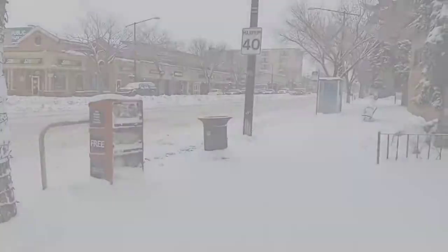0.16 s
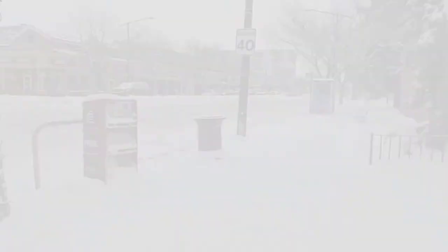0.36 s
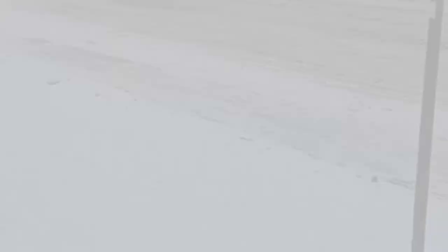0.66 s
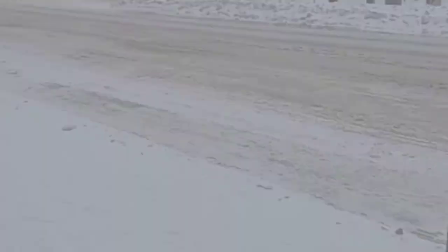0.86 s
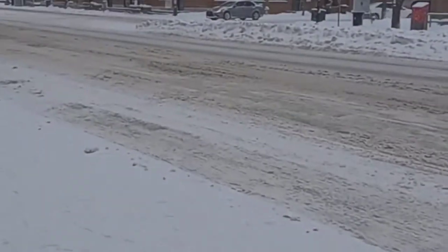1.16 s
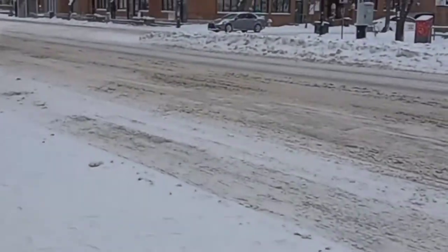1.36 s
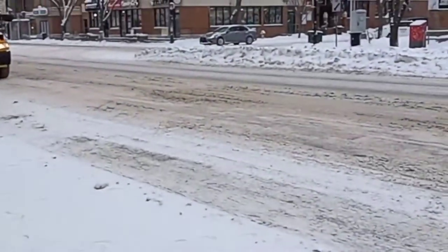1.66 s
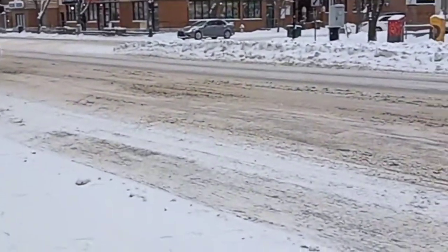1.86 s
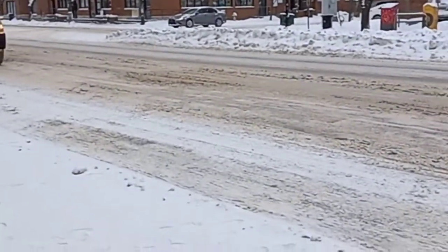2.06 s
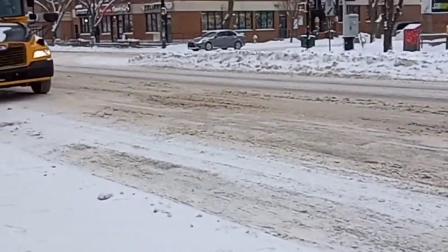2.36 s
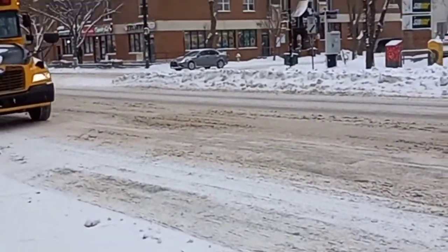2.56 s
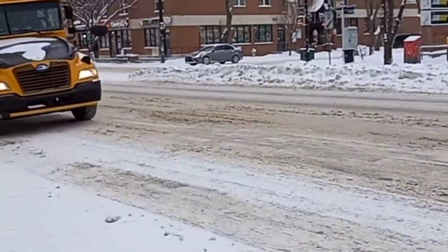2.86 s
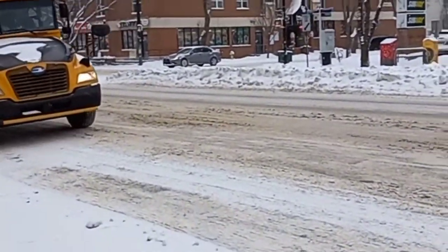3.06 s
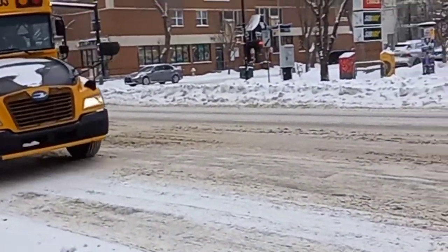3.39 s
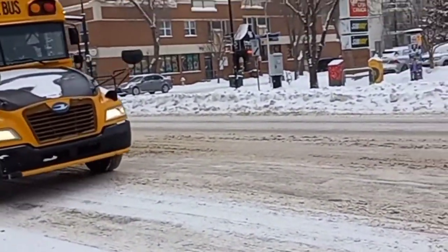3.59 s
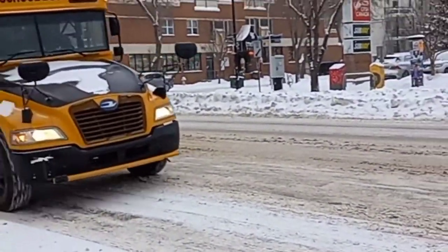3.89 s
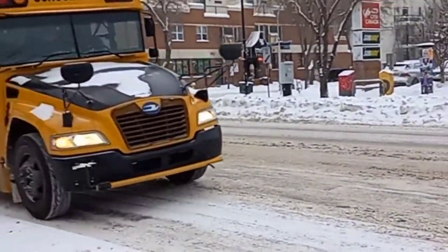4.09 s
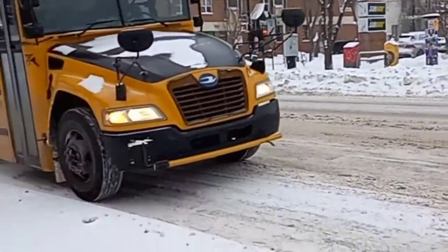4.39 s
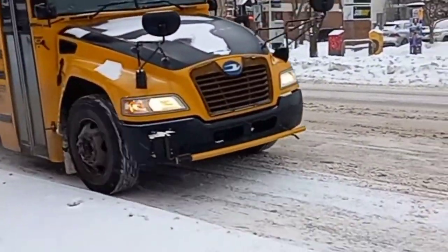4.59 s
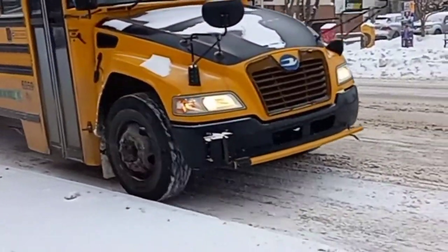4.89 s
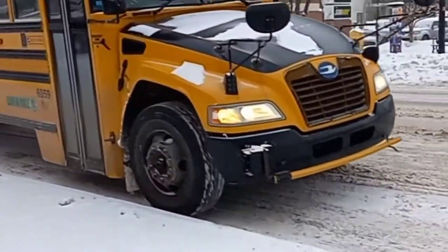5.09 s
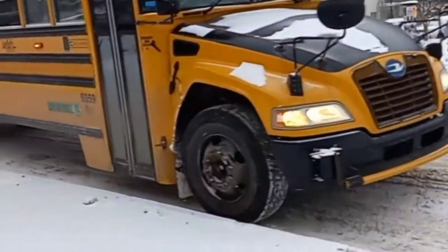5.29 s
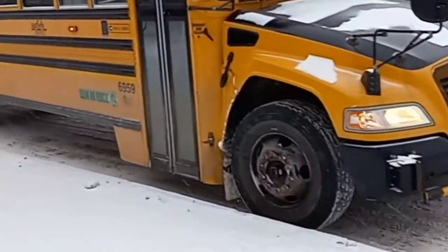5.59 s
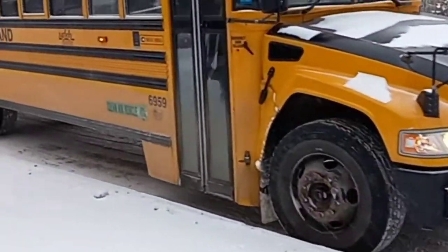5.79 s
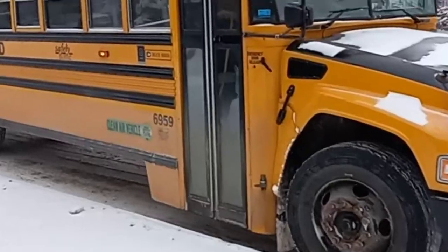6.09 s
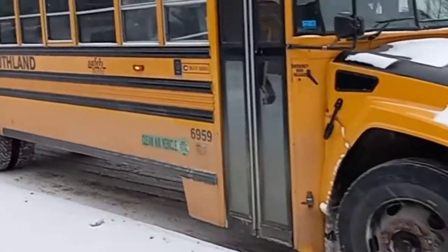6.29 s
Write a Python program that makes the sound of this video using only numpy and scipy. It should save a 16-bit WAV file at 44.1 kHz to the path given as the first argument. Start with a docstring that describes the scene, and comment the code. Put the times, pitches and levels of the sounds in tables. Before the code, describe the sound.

On a snowy street, a heavy bus creeps close with low rumble and snow crunch, piercing wavering brake squeals, soft air hisses and a final juddering groan.

```python
"""A school bus creeps up to the kerb of a snowy street and stops beside the listener.
Its engine is a stack of low harmonics; noise and ringing make the body rumble and boom and the tyres crunch snow.
The brakes squeal as wavering tones, let off air twice as hissing noise, and groan at the end in uneven jerks.
Far traffic, a wash of noise, is heard first, then a brief silence; puffs of wind and a faint hiss join the bus."""
import sys
import numpy as np
from scipy import signal
from scipy.io import wavfile

SR = 44100
rng = np.random.default_rng(int(sys.argv[2]) if len(sys.argv) > 2 else 0)


def store_wav(level_fs):
    """Save 16-bit WAV to argv[1]."""
    pcm = np.round(np.clip(np.atleast_2d(level_fs), -1, 1) * 32767)
    wavfile.write(sys.argv[1], SR, pcm.T.astype(np.int16))


N = 284445
TIME = np.arange(N) / SR  # seconds
CUTOFF_HZ = 15600  # nothing is kept above this

# Default stereo balance. Each row: frequency in Hz, left over right in dB.
BALANCE = [(60, -0.3), (200, -1), (380, -4), (700, 4), (1300, -2), (2400, -2), (8000, 3), (15000, -2)]
# How alike left and right are by default. Each row: frequency in Hz, likeness (1 same, 0 unrelated).
LIKENESS = [(60, 0.96), (130, 0.95), (290, 1), (450, 0.23), (800, 0.72), (1300, 0.89), (3000, 0.03),
            (5500, 0.08), (7000, 0.7), (15000, 1)]

# Tone of the far traffic. Each row: frequency in Hz, strength in dB per Hz.
TRAFFIC_COLOUR = [(36, -33), (55, -11), (76, 6), (110, -7), (200, -11.5), (290, -10), (360, -17),
                  (650, -20), (950, -23), (1300, -22.5), (2100, -29.5), (2850, -35.5), (3500, -36),
                  (4700, -44), (7200, -44), (9500, -61), (15000, -53)]
# Far traffic hisses mostly from the right. Each row: frequency in Hz, left over right in dB.
TRAFFIC_BALANCE = [(60, -0.5), (700, -0.5), (1300, -3), (2600, -12), (5200, -5), (7500, -6), (10000, -1)]
# Far traffic in left and right. Each row: frequency in Hz, likeness (below 0 means opposed).
TRAFFIC_LIKENESS = [(130, 0.96), (300, 0.85), (700, -0.26), (1300, -1.11), (2600, 0.66), (5200, -0.22),
                    (7500, 0.82), (10000, 1)]
# Far tyres swish past twice. Each row: time in seconds, lift of the hiss in dB.
FAR_SWISH = [(0, 6), (0.07, 4), (0.2, -0.5), (0.33, 5), (0.5, -1)]
TRAFFIC_DB = -30  # the wash before the swish is added
# The brief silence: its start and its end in seconds.
SILENCE_S = (0.505, 0.537)

# How near the bus sounds. Each row: time in seconds, nearness from 0 to 1.
NEARNESS = [(0.55, 0.18), (2.0, 0.27), (3.3, 1), (4.4, 0.86), (5.4, 0.8), (6.15, 0.77)]
# Engine. Each row: time in seconds, exhaust pulses per second of one cylinder bank,
# level in dB before a fixed trim.
ENGINE = [(0.54, 26.4, -38), (2.2, 32, -44), (4.0, 38.4, -52), (4.7, 27.6, -35.5), (5.0, 28, -22.5),
          (5.3, 29.9, -28.5), (5.65, 25, -23.5), (5.9, 25, -33), (6.1, 24, -55), (6.45, 27, -32)]
# Engine harmonics. Each row: multiple of the pulse rate, strength in dB against each other.
ENGINE_HARMONICS = [(2, -3.5), (3, 1), (4, -13), (5, -16.5), (6, -14), (9, -13), (10, -27.5)]
# Ruts that set the body booming. Each row: start in seconds, length in seconds, level in dB, pitch in Hz.
RUTS = [(0.534, 0.092, -35.5, 78.1), (2.334, 0.079, -30.5, 95.7), (2.551, 0.13, -25, 84),
        (2.883, 0.034, -31.5, 89.6), (3.065, 0.047, -26.5, 87.3), (3.237, 0.065, -30, 88),
        (3.395, 0.15, -26, 96.5), (3.915, 0.11, -28, 90.4), (4.101, 0.25, -26.5, 91.7),
        (4.795, 0.23, -32.5, 81.2), (5.84, 0.25, -28, 83)]
BOOM_ATTACK_S, BOOM_RELEASE_S = 0.031, 0.029
ROAD_BOOM_DB, ROAD_BOOM_HZ = -44.5, 84  # the faint boom kept up all the way
# Tone of the running gear. Each row: frequency in Hz, strength in dB per Hz.
RUMBLE_COLOUR = [(21, -41), (36, -15.5), (67, -4), (86, 3), (162, -9.5), (215, -11.5), (289, -7),
                 (318, -22), (345, -20), (437, -14.5), (600, -29.5), (780, -50), (1320, -120)]
# Rumble of the rolling bus. Each row: time in seconds, level of its 125-400 Hz part in dB.
RUMBLE = [(0.56, -39), (0.9, -38.5), (2.1, -37), (2.5, -34), (2.95, -38), (3.25, -33.5), (3.85, -35),
          (4.12, -31), (4.55, -36), (4.78, -31.5), (6.12, -36.5)]

# Tone of the crunching snow. Each row: frequency in Hz, strength in dB per Hz.
CRUNCH_COLOUR = [(380, 4.5), (470, 0.5), (560, -9.5), (680, 7), (850, 0), (1100, -1.5), (1300, -12),
                 (1700, -23)]
# Packed snow under the tread. Each row: start in seconds, length in seconds,
# load in dB before the crunch is mixed.
PACKED_SNOW = [(0.696, 0.028, -49.5), (1.442, 0.32, -45.5), (2.355, 0.053, -41.5), (2.487, 0.11, -40.5),
               (3.024, 0.72, -45.5), (3.836, 0.72, -41.5), (4.654, 0.19, -41), (4.88, 0.18, -40),
               (5.156, 0.043, -39.5), (6.3, 0.012, -41.5), (6.428, 0.022, -44)]
LOOSE_SNOW_DB = -48.5  # load elsewhere, also before mixing
SNOW_ATTACK_S, SNOW_RELEASE_S = 0.069, 0.042  # rolling on to and off a packed stretch
LUMPS_DB = -56.5  # small lone lumps
# Tone of the spray. Each row: frequency in Hz, strength in dB per Hz.
SLUSH_COLOUR = [(710, -6), (1200, 1.5), (1410, -0.5), (1840, -1.5), (2750, -8), (3360, -6), (4090, -12.5),
                (5800, -19.5), (7540, -56), (12800, -120)]
# Spray off the tyres. Each row: time in seconds, level of its 1290-3230 Hz part in dB.
SLUSH = [(0.56, -51), (1.05, -48.5), (1.36, -49), (1.43, -45), (1.9, -47), (2.1, -43.5), (2.52, -44),
         (2.75, -44.5), (3.5, -44.5), (4.05, -46.5), (4.17, -49.5), (4.9, -48.5), (5.25, -51), (5.8, -49.5),
         (6.45, -54)]
# Tone of the faint hiss. Each row: frequency in Hz, strength in dB per Hz.
HISS_COLOUR = [(4000, -1.5), (7500, 10), (9500, -16), (13000, 10), (15500, -26)]

# The squeal sinks as the pedal goes down and rises as it eases. Each row: time in seconds, pitch in Hz.
SQUEAL_PITCH = [(0.55, 6620), (1.05, 6685), (2.0, 6665), (2.45, 6695), (3.0, 6650), (3.6, 6595),
                (4.5, 6535), (4.57, 6465), (5.0, 6450), (5.2, 6475), (5.54, 6474), (5.62, 6570),
                (5.68, 6590), (6.13, 6335), (6.19, 6230), (6.215, 6335), (6.39, 6270), (6.42, 6200)]
# Each time the linings catch. Each row: start in seconds, length in seconds, whistle in dB, rasp in dB,
# how far the rasp lies below the squeal pitch in Hz, whistle overtone against the whistle in dB,
# left over right in dB.
GRIPS = [(0.575, 0.5, -54, -50, 92, -33, -7), (1.036, 0.35, -53.5, -46, 77, -28, -2.5),
         (1.451, 0.41, -47, -42.5, 100, -22, -5), (1.925, 0.091, -48, -44, 60, -31, -3),
         (2.036, 0.18, -49, -38.5, 140, -24, -4.5), (2.25, 0.095, -53, -48, 150, -28, -3),
         (2.393, 0.12, -45, -53, 64, -25, 3.5), (2.541, 0.077, -44, -46.5, 64, -28, 2),
         (2.622, 0.11, -50, -44, 120, -32, -3), (2.777, 0.21, -42, -46.5, 87, -32, 5),
         (3.038, .05, -48, -51, 49, -24, 0), (3.186, 0.3, -50, -39.5, 73, -24, -1),
         (3.492, 0.14, -43, -42, 50, -24, 0), (3.718, 0.016, -53, -38.5, 40, -24, -1),
         (3.783, 0.24, -42, -45, 63, -31, 1.5), (4.105, 0.082, -39, -36, 60, -32, 1.5),
         (4.23, 0.22, -40.5, -40, 90, -26, 1.5), (4.496, 0.033, -41, -50, 40, -35, -6),
         (4.565, 0.1, -35, -44, 40, -37, -5.5), (4.72, 0.048, -50.5, -58, 20, -33, -3),
         (4.817, 0.096, -44, -41, 31, -19, 5), (4.933, 0.015, -31, -37, 20, -27, -12),
         (4.98, 0.044, -27, -35, 20, -25, -11), (5.16, 0.056, -34, -49, 36, -30, -4),
         (5.257, 0.046, -26.5, -58, 36, -28, 1), (5.341, 0.027, -23.5, -58, 36, -37, -4),
         (5.427, 0.03, -29.5, -63, 36, -19, -8), (5.48, 0.04, -21, -54, 50, -21.5, -6.5),
         (5.562, 0.036, -28, -35, 50, -22.5, -12), (5.624, 0.023, -48, -38.5, 30, -26, -10),
         (6.156, 0.023, -34, -37, 6.9, -17, 0), (6.216, 0.079, -31, -40, 12, -26, 1),
         (6.369, 0.034, -34.5, -39, 50, -18, -9.5)]
GRIP_ATTACK_S, GRIP_RELEASE_S = 0.031, 0.05
GRIP_SWELL_DB, GRIP_CREST = 4, 0.67  # the swell, and the share of the length where it peaks
STUTTER, STUTTER_HZ = 0.14, 35  # depth and speed limit of the whistle's shaking
SQUEAL_LAG_WANDER_S = 0.000021

# Snow cracking under the tread. Each row: time in seconds, peak in dB, pitch in Hz.
CRACKS = [(0.668, -35, 1400), (0.718, -31, 800), (0.7933, -37, 900), (0.816, -29.5, 1070),
          (0.8512, -29, 990), (0.885, -34, 1080), (0.9123, -38, 1000), (1.0705, -29, 1370),
          (1.175, -27.5, 1300), (1.3355, -30, 950), (1.414, -29, 1170), (1.523, -33, 1000),
          (1.66, -32, 900), (1.6946, -23, 920), (1.755, -29, 950), (1.889, -32, 1000), (2.083, -28, 880),
          (2.359, -25, 980), (2.389, -27, 810), (2.472, -26.5, 1110), (2.519, -21, 840),
          (2.586, -19.5, 865), (4.3083, -24.5, 1000), (4.945, -25.5, 830), (5.356, -31, 850)]
# Puffs of wind on the microphone. Each row: start in seconds, length in seconds,
# level in dB before panning, left over right in dB.
GUSTS = [(0.812, 0.074, -29, 10), (1.087, 0.018, -32, 4), (2.083, 0.022, -38, 10), (3.05, 0.087, -37, 5),
         (3.29, 0.54, -38.5, 2)]
GUST_ATTACK_S, GUST_RELEASE_S = 0.024, 0.058
# Small bright ticks of grit. Each row: time in seconds, snap at its peak in dB, tail at its start in dB.
TICKS = [(1.031, -46, -58), (1.037, -34, -43.5), (2.4195, -41, -54), (2.427, -40, -46), (2.497, -54, -45)]
TICK_SNAP_S, TICK_TAIL_S = 0.00089, 0.028  # when the snap peaks; when the tail is down to 37 %

# Air let out of the brakes. Each row: start in seconds, length in seconds, level in dB, swell in dB.
AIR_RELEASES = [(2.999, 0.73, -38.5, 6), (5.74, .39, -47, 0.5)]
# Tone of each release, one list apiece. Each row: frequency in Hz, strength in dB per Hz.
AIR_COLOURS = [
    [(2500, -7), (3600, -9), (4700, -18), (6100, -6), (7000, -3), (7700, -1), (8500, -7.5), (11000, -5.5),
     (13000, -11), (15500, -11)],
    [(2500, -2), (3600, -6), (5200, -3), (6300, -12), (7350, 10.5), (8500, -8), (11200, -5), (13000, -8),
     (15500, -15)],
]
# Stereo balance of the air. Each row: frequency in Hz, left over right in dB.
AIR_BALANCE = [(3000, -9.5), (5500, -5.5), (7500, -5.5), (11000, -8)]
# The air in left and right. Each row: frequency in Hz, likeness.
AIR_LIKENESS = [(5500, 0), (7500, 0.6), (9500, 0.1), (13000, 0.82)]
VALVE_OPEN_S, VALVE_CLOSE_S, AIR_CREST = 0.15, 0.16, 0.32  # the jet peaks at this share of its length
NOZZLE_HZ, NOZZLE_WIDTH_HZ, NOZZLE_RING = 7470, 290, 0.53  # the valve mouth rings in the jet
# The vent's hollow note. Each row: frequency in Hz, width in Hz, strength in dB.
VENT_MODES = [(3130, 270, -2), (4160, 1700, -1.5)]
VENT_S, VENT_LENGTH_S, VENT_DB, VENT_ATTACK_S, VENT_RELEASE_S = 3.47, 0.35, -46.5, 0.04, 0.09

# Other wheels that join the squeal. Each row: start in seconds, length in seconds,
# pitch above the main squeal in Hz, level in dB before panning.
OTHER_BRAKES = [(4.28, 0.18, -145, -45), (4.77, 0.32, 90, -44), (4.836, 0.26, -66.5, -36)]
# Ringing of the chassis. Each row: frequency in Hz, width in Hz, strength in dB.
CHASSIS = [(76, 23, 1), (125, 28.4, 4), (171, 68, -2), (222, 44, 0), (291, 38, -2), (570, 170, -21.5),
           (800, 230, -29)]
GROAN_S, GROAN_LENGTH_S, GROAN_DB, GROAN_ATTACK_S, GROAN_RELEASE_S = 6.22, 0.16, -21, 0.053, 0.2


def from_db(db):
    """Turn decibels into a plain multiplier."""
    return 10 ** (np.asarray(db) / 20)


def rms_one(x):
    """Scale a sound to an average strength (rms) of 1."""
    return x / np.sqrt(np.mean(x ** 2) + 1e-20)


def in_time(rows):
    """Draw each column of a table as a curve, sample by sample."""
    seconds, *columns = np.transpose(rows)
    return [np.interp(TIME, seconds, column) for column in columns]


def at_hz(points, hz):
    """Read a table at one frequency, on a logarithmic pitch scale."""
    table = np.array(points)
    return np.interp(np.log(hz), np.log(table[:, 0]), table[:, 1])


def panned(x, pan_db):
    """Make stereo, with the left louder than the right by pan_db."""
    return np.array([x * from_db(pan_db / 2), x * from_db(-pan_db / 2)])


def lagged(x, lag_s):
    """Sound from the left reaches the right channel a little later."""
    return np.array([x[0], np.interp(TIME - lag_s, TIME, x[1])])


def drift(rate):
    """Slow random wandering of spread 1: noise smoothed above about rate in Hz."""
    step = 20  # drawn at every 20th sample, then joined by lines
    r = np.exp(-2 * np.pi * rate * step / SR)
    noise = rng.standard_normal(N // step + 3002)
    slow = signal.lfilter([1], [1, -2 * r, r * r], noise)[3000:]  # skip the filter's start-up
    return np.interp(np.arange(N) / step, np.arange(len(slow)), rms_one(slow))


def jolts(rate_hz):
    """Random shaking of both the height and the phase of a swing; rms 1."""
    smooth = signal.butter(3, rate_hz, fs=SR, output="sos")
    a, b = rms_one(signal.sosfilt(smooth, rng.standard_normal((2, N))))
    return (a + 1j * b) / np.sqrt(2)


def turning(hz):
    """Phase of something that turns at a changing rate, from a random start."""
    return 2 * np.pi * (np.cumsum(hz) / SR + rng.random())


def envelope(start, length, attack_s, release_s, swell_db=0, crest=.5):
    """Opens just before the start, holds while swelling to a crest and back, then closes."""
    end = start + length
    peak = start + np.clip(crest, .01, .99) * length
    below_crest = np.interp(TIME, [start, peak, end], [1, 0, 1])
    gate = np.interp(TIME, [start - attack_s, start, end, end + release_s], [0, 1, 1, 0])
    return gate * from_db(-swell_db * below_crest)


def band(x, low_hz, high_hz, order=2):
    """Keep only the frequencies between two limits."""
    limits = [low_hz, min(high_hz, SR / 2 - 500)]
    return signal.sosfilt(signal.butter(order, limits, "band", fs=SR, output="sos"), x)


def resonate(x, hz, width_hz):
    """Let a sound ring at one pitch; a narrower width rings longer."""
    r = np.exp(-np.pi * width_hz / SR)
    feed = np.array([1, 0, -1]) * (1 - r * r) / 2
    return signal.lfilter(feed, [1, -2 * r * np.cos(2 * np.pi * hz / SR), r * r], x + 1e-18)


def diffuse(colour, flicker_db, flicker_rate, balance=BALANCE, likeness=LIKENESS):
    """Third-octave bands of stereo noise, each with its own level, flicker and likeness; rms 1."""
    low, high = colour[0][0], min(colour[-1][0], CUTOFF_HZ)
    edges = np.geomspace(low, high, int(3 * np.log2(high / low)) + 2)
    white = rng.standard_normal((2, 2, N))
    together, out = drift(flicker_rate), 0
    for k, (a, b) in enumerate(zip(edges, edges[1:])):
        mid, side = band(white[k % 2], a, b)  # neighbouring bands use different noise
        hz = np.sqrt(a * b)
        alike = np.clip(at_hz(likeness, hz), -.99, .99)
        flicker = flicker_db * (together + drift(flicker_rate)) / np.sqrt(2)
        gain = from_db(at_hz(colour, hz) + flicker)
        stereo = np.sqrt(1 + alike) * mid + np.sqrt(1 - alike) * side * [[1], [-1]]
        out = out + gain * stereo * from_db(at_hz(balance, hz) * np.array([[.5], [-.5]]))
    return rms_one(out)


def traffic(swish_hz=2650, swish_width_hz=2200):
    """Far engines and tyres merge into one wash whose hiss swells and sinks."""
    wash = diffuse(TRAFFIC_COLOUR, flicker_db=2.0, flicker_rate=21,
                   balance=TRAFFIC_BALANCE, likeness=TRAFFIC_LIKENESS)
    lift, = in_time(FAR_SWISH)
    swish = (from_db(lift) - 1) * resonate(wash, swish_hz, swish_width_hz)
    return from_db(TRAFFIC_DB) * (wash + swish)


def engine():
    """The muffled exhaust leaves low harmonics of the pulse rate, each a little unsteady."""
    rate, level_db = in_time(ENGINE)
    pulse_phase = turning(rate * (1 + 0.01057 * drift(5.05)))
    throb = 0
    for multiple, db in ENGINE_HARMONICS:
        strength = from_db(db + 2.6 * drift(2.4))
        throb = throb + strength * np.sin(round(multiple) * pulse_phase + 2 * np.pi * rng.random())
    return from_db(level_db - 3.5) * rms_one(throb)


def boom(wander=0.0727, flicker_db=1.5):
    """The long body swings faintly all the way, and loudly through each rut."""
    unsteady = 1 + wander * drift(17.9)
    swing = from_db(ROAD_BOOM_DB + 2 * drift(22)) * np.sin(turning(ROAD_BOOM_HZ * unsteady))
    for s, length, db, hz in RUTS:
        shape = envelope(s, length, BOOM_ATTACK_S, BOOM_RELEASE_S)
        swing = swing + from_db(db) * shape * np.sin(turning(hz * unsteady))
    return np.sqrt(2) * swing * from_db(flicker_db * drift(34))


def body(jostle_db=1.2, jostle_rate=9):
    """A broad rumble of running gear, jostled by the uneven snow."""
    rumble_db = in_time(RUMBLE)[0] + jostle_db * drift(jostle_rate)
    near = np.clip(in_time(NEARNESS)[0], 0, 1)
    rumble = diffuse(RUMBLE_COLOUR, flicker_db=1.5, flicker_rate=14.3)
    rumble = rumble - 0.7 * resonate(rumble, 90.7, 39)  # the boom takes up the energy near its own pitch
    # from afar the rumble is dull; close by, the bonnet and wheel arch drone
    dull = 0.37 * resonate(rumble, 161, 72) + 0.57 * resonate(rumble, 44, 25) - 0.97 * resonate(rumble, 370, 420)
    drone = 0.74 * resonate(rumble, 289.6, 46)
    rumble = rumble + (1 - near) * dull + near * drone
    return from_db(rumble_db) * rumble / np.std(band(rumble, 125, 400))


def snow_grains(per_s, spread_db, top_hz, width_hz):
    """Snow crystals give way in clumps; each collapse is a dull knock of a few cycles."""
    sizes = from_db(spread_db * np.minimum(rng.exponential(1, N), 4)) * rng.choice([-1, 1], N)
    clicks = sizes * (rng.random(N) < per_s * from_db(4 * drift(15)) / SR)
    pitches = np.geomspace(600, top_hz, num=8)
    chosen = rng.integers(0, len(pitches), N)
    bearing = rng.uniform(0, np.pi / 2, N)  # each grain has its own place between left and right
    clicks = clicks * [np.cos(bearing), np.sin(bearing)]
    knocks = sum(resonate(clicks * (chosen == k), hz, width_hz) for k, hz in enumerate(pitches))
    return rms_one(band(knocks, 500, top_hz))


def tyres():
    """The tread crunches snow, harder where packed, bursts lone lumps and throws a soft hiss of slush."""
    packed = 0
    for s, length, db in PACKED_SNOW:
        packed = packed + (from_db(db) * envelope(s, length, SNOW_ATTACK_S, SNOW_RELEASE_S)) ** 2
    load = np.sqrt(from_db(LOOSE_SNOW_DB) ** 2 + packed)
    grains = snow_grains(per_s=600, spread_db=1.5, top_hz=1106, width_hz=370)
    grind = diffuse(CRUNCH_COLOUR, flicker_db=1.5, flicker_rate=31)
    crunch = from_db(0.5) * grind + from_db(-3.0) * grains
    lumps = from_db(LUMPS_DB) * snow_grains(per_s=70, spread_db=3.0, top_hz=1580, width_hz=330)
    slush = diffuse(SLUSH_COLOUR, flicker_db=1.5, flicker_rate=21.4)
    far = 1 - np.clip(in_time(NEARNESS)[0], 0, 1)
    slush = slush - 0.45 * far * resonate(slush, 4200, 2200)  # distance dulls the spray
    slush = from_db(in_time(SLUSH)[0]) * slush / np.std(band(slush, 1290, 3230))
    return lagged(load * crunch + lumps, lag_s=0.00016) + lagged(slush, lag_s=0.00045)


def hiss():
    """A faint, flickering high hiss of noise."""
    return from_db(-58.5) * diffuse(HISS_COLOUR, flicker_db=3.0, flicker_rate=11)


def grip(start, length):
    """A squeal catches, swells and lets go."""
    return envelope(start, length, GRIP_ATTACK_S, GRIP_RELEASE_S, GRIP_SWELL_DB, GRIP_CREST)


def squeal(scatter_hz=100, rasp_octave_db=-6, flutter_db=2.6, waver_hz=4, skirt_db=-17, skirt_hz=400):
    """Rubbing linings whistle with a stutter under even grip, and rasp just below where they chatter."""
    hz, = in_time(SQUEAL_PITCH)
    tone = (1 + STUTTER * jolts(STUTTER_HZ)) * np.exp(1j * turning(hz + waver_hz * drift(37.0)))
    flutter = from_db(flutter_db * drift(28)) / np.hypot(1, STUTTER)
    shaking = jolts(scatter_hz) + from_db(skirt_db) * jolts(skirt_hz)
    chatter = shaking * np.exp(1j * turning(hz)) * from_db(0.75 * drift(27))
    out = np.zeros((2, N))
    for s, length, whistle_db, rasp_db, below_hz, octave_db, pan_db in GRIPS:
        held = grip(s, length)
        on = held > 0
        swing = chatter[on] * np.exp(-2j * np.pi * below_hz * TIME[on])  # moved down in pitch
        # squaring a swing gives its overtone, one octave up
        whistle = flutter[on] * (tone[on] + from_db(octave_db) * tone[on] ** 2).real
        rasp = (swing + from_db(octave_db + rasp_octave_db) * swing ** 2).real
        sound = np.sqrt(2) * held[on] * (from_db(whistle_db) * whistle + from_db(rasp_db) * rasp)
        # the division keeps the total power the same wherever it is panned
        out[:, on] += panned(sound, pan_db) / np.sqrt(np.cosh(pan_db * np.log(10) / 20))
    # reflections off road and body reach each channel with a shifting strength and delay
    return lagged(out * panned(1, 1.1 * drift(21)), lag_s=SQUEAL_LAG_WANDER_S * drift(7.4))


def cracks(crumble_s=0.0011, width_hz=480, crisp_db=-8):
    """Larger slabs of snow break with one dry knock, a crisp edge and a short crumble."""
    out, size = np.zeros((2, N)), SR // 20
    age = np.arange(size) / SR
    noises = rng.standard_normal((len(CRACKS), 3, size))
    for (s, peak_db, hz), (shared, *own) in zip(CRACKS, noises):
        crumble = (0.1 * shared + 0.04 * np.array(own)) * np.exp(-age / crumble_s)
        push = (age == 0) + crumble
        edge = from_db(crisp_db) * resonate(push, 1.32 * hz, width_hz)
        knock = band(resonate(push, hz, width_hz) - edge, 500, 2500)
        knock = from_db(peak_db) * knock / np.abs(knock).max(axis=1, keepdims=True)
        at = int(s * SR)
        out[:, at:at + size] += knock[:, :N - at]
    return lagged(out, lag_s=0.00018)


def wind(lump_db=1.0, lump_rate=25):
    """Puffs of wind buffet each channel with its own low noise, mostly the left."""
    puffs = 0
    for s, length, db, pan_db in GUSTS:
        puffs = puffs + panned(from_db(db) * envelope(s, length, GUST_ATTACK_S, GUST_RELEASE_S), pan_db)
    buffeting = rms_one(band(rng.standard_normal((2, N)), 51.5, 119.5, order=3))
    return puffs * from_db(lump_db * drift(lump_rate)) * buffeting


def ticks():
    """Grit flicks off the tread: a bright snap, then a short, duller tail."""
    snap, tail = np.zeros((2, N))
    for s, snap_db, tail_db in TICKS:
        age = np.maximum(TIME - s, 0)
        snap += from_db(snap_db) * age / TICK_SNAP_S * np.exp(1 - age / TICK_SNAP_S)
        tail += from_db(tail_db) * (age > 0) * np.exp(-age / TICK_TAIL_S)
    bright, dull = rng.standard_normal((2, 2, N))
    return snap * rms_one(band(bright, 4100, 8000, order=1)) + tail * rms_one(band(dull, 2100, 7500))


def vent_note():
    """The vent sings a hollow note as the pressure falls: noise rung twice at each pitch."""
    flow = rng.standard_normal((2, N))
    note = 0
    for hz, width, db in VENT_MODES:
        note = note + from_db(db) * resonate(resonate(flow, hz, width), hz, width)
    return from_db(VENT_DB) * envelope(VENT_S, VENT_LENGTH_S, VENT_ATTACK_S, VENT_RELEASE_S) * rms_one(note)


def air(mouth_swing=0.21, mouth_width_hz=1500, sputter_db=1.15, sputter_rate=9):
    """The brake valve vents a bright jet on each release; its mouth rings less as the pressure falls."""
    out = vent_note()  # ends the first release
    for (s, length, db, swell_db), colour in zip(AIR_RELEASES, AIR_COLOURS):
        jet = diffuse(colour, flicker_db=1.5, flicker_rate=14, balance=AIR_BALANCE, likeness=AIR_LIKENESS)
        ring = NOZZLE_RING * resonate(jet, NOZZLE_HZ, NOZZLE_WIDTH_HZ)
        jet = rms_one(jet + ring - .5 * resonate(jet, 6140, 900))
        pressure = np.interp(TIME, [s, s + length], [1, -1])  # above, then below its middle value
        jet = jet + mouth_swing * pressure * resonate(jet, NOZZLE_HZ, mouth_width_hz)
        level = from_db(db + sputter_db * drift(sputter_rate))
        out = out + level * envelope(s, length, VALVE_OPEN_S, VALVE_CLOSE_S, swell_db, AIR_CREST) * jet
    return out


def other_brakes():
    """Neighbouring brakes follow the same pedal at slightly different pitches and beat with the squeal."""
    out, hz = 0, in_time(SQUEAL_PITCH)[0]
    for s, length, above_hz, level_db in OTHER_BRAKES:
        tone = np.sqrt(2) * np.sin(turning(hz + above_hz + 16 * drift(32.7)))
        tone = tone * from_db(level_db + 3.3 * drift(27))
        out = out + grip(s, length) * lagged(panned(tone, pan_db=-7.5), lag_s=.00002 * drift(3.2))
    return out


def groan(slips_per_s=68, unevenness=0.2, shiver_db=0.5):
    """Uneven stick-slip of the last turn of the wheels shakes the chassis."""
    count = turning(slips_per_s * np.exp(unevenness * drift(60))) // (2 * np.pi)
    slips = np.diff(count, prepend=count[0]) * from_db(shiver_db * drift(56))  # one click per slip
    slips = slips + 0.032 * rng.standard_normal(N)  # roughness shared by left and right
    slips = slips + 0.0059 * rng.standard_normal((2, N))
    shake = 0
    for k, (hz, width, db) in enumerate(CHASSIS):
        shake = shake + (-1) ** k * from_db(db) * resonate(slips, hz, width)
    shape = envelope(GROAN_S, GROAN_LENGTH_S, GROAN_ATTACK_S, GROAN_RELEASE_S)
    return from_db(GROAN_DB) * shape * rms_one(band(shake, 48, 1030))


def scene():
    """The far street up to the middle of the silence, then the arriving bus."""
    bass = lagged(panned(engine() + boom(), pan_db=0.0), lag_s=0.0002)
    snow = tyres() + cracks() + ticks()
    brakes = squeal() + air() + other_brakes() + groan()
    bus = bass + body() + snow + brakes + wind() + hiss()
    return np.where(TIME < np.mean(SILENCE_S), traffic(), bus)


def record(dry):
    """The microphone drops the deepest bass, the sound cuts out briefly, the top is cut."""
    thin = signal.sosfilt(signal.butter(4, 40, "high", fs=SR, output="sos"), dry)
    start, end = SILENCE_S
    gapped = thin * (1 - envelope(start, end - start, .002, .002))
    return signal.sosfilt(signal.ellip(10, .1, 80, CUTOFF_HZ, fs=SR, output="sos"), gapped)


dry = scene()
out = record(dry)
store_wav(out)
```